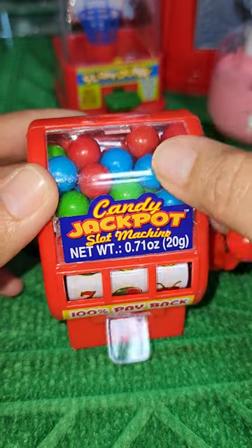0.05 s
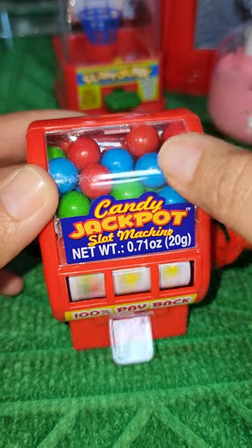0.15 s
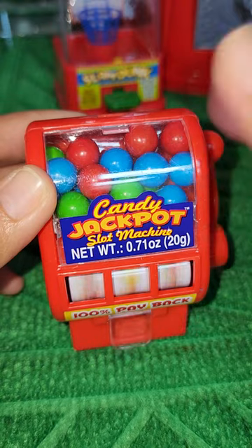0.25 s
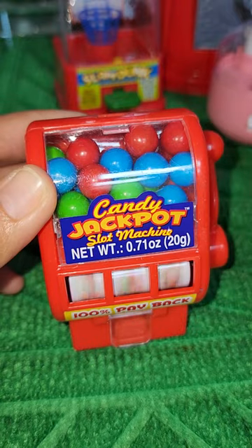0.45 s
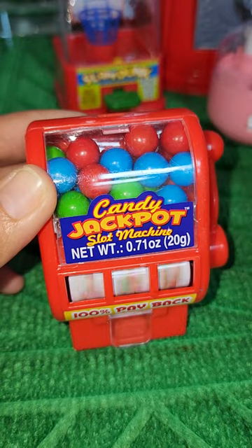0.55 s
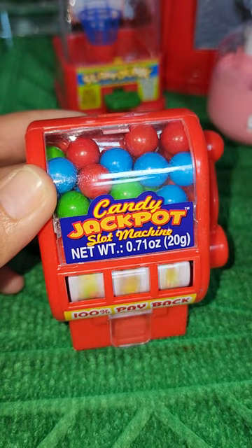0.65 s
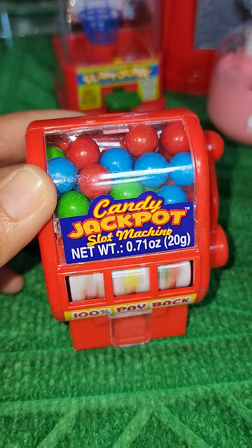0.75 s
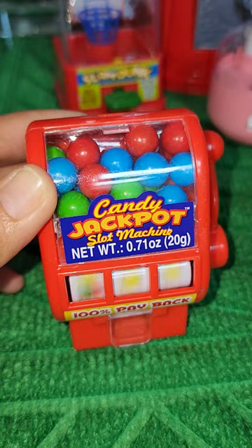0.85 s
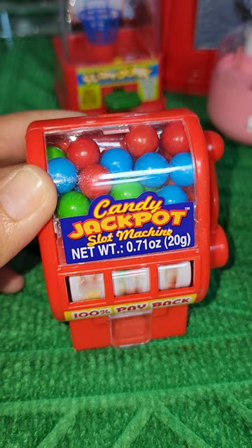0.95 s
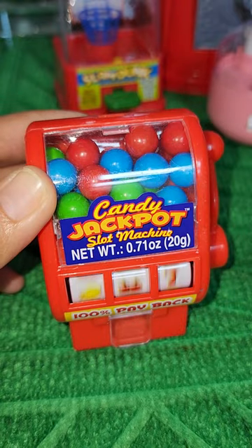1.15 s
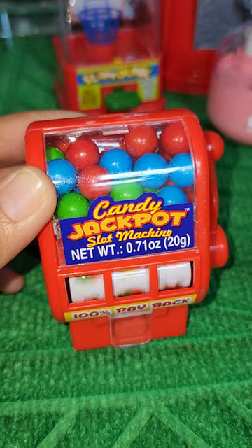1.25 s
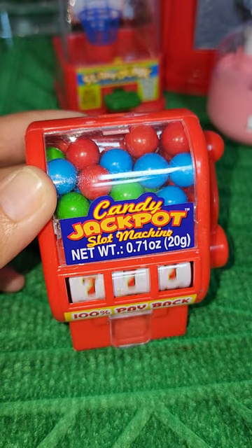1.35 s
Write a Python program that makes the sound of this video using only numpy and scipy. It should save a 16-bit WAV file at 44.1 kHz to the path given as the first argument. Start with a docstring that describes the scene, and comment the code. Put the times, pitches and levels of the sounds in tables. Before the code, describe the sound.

A small plastic toy slot machine spins close to the microphone in a quiet room. At about 0.2 seconds its lever rasps quickly back over the gears and snaps against its stop just before 0.3 seconds, the loudest moment. Loose reels then rattle and whir inside the hollow casing, gradually weakening. From about 0.9 seconds only a soft whir with a few faint ticks remains, until around 1.4 seconds.

```python
"""A small plastic toy slot machine is held close to the microphone in a quiet room.
Its lever is let go, rasps back over the gears and snaps against its stop. Three loose reels spin,
knock about on their axle and settle into a soft whir; every contact rings the hollow casing."""
import sys
import numpy as np
from scipy import signal
from scipy.fft import rfft, irfft
from scipy.io import wavfile

SR = 44100
rng = np.random.default_rng(int(sys.argv[2]) if len(sys.argv) > 2 else 0)


def wrap_up_sound(samples):
    """Save the sound to the file named by the first command line argument, as 16-bit audio."""
    columns = np.atleast_2d(samples).T
    # keep every value between -1 and 1, then stretch to whole-number steps
    tamed = np.clip(columns, -1, 1)
    steps = np.round(tamed * 32767).astype(np.int16)
    wavfile.write(sys.argv[1], SR, steps)


N = 61739

# gear teeth slip as the lever returns: (s, level dB, treble relative to it dB, chatter length s)
GEAR_SLIPS = [(0.2088, -30, -20, .004), (0.2142, -15, -22, .001), (0.2225, -18, -13, .006), (0.2345, -15, -15, .006), (0.2440, -17, -13, .005), (0.2482, -16, -14, .004), (0.2530, -12, -15, .004), (0.2590, -16, -10, .005), (0.2652, -15, -11, .005), (0.2698, -17, -14, .003)]  # fixed
# the lever hits its stop and bounces: (s, level dB, treble relative to it dB, chatter length s)
LEVER_STOP = [(0.2836, -6.5, -11, .003), (0.2868, -8.5, -8, .008)]  # fixed
# the reels knock on their axle: (s, level dB, treble relative to it dB)
REEL_KNOCKS = [(0.3104, -20, -4), (0.3246, -15, -15), (0.3356, -15, -15), (0.3465, -21, -9), (0.3541, -15, -12),
               (0.3631, -19, -15), (0.3735, -17, -15), (0.3847, -21, -7), (0.3923, -17, -14), (0.4185, -19, -12),
               (0.4294, -20, -13), (0.4391, -23, -11), (0.4543, -24, -11), (0.4717, -18, -11), (0.4968, -30, -11),
               (0.5042, -24, -11), (0.5145, -26, -11), (0.5222, -25, -14), (0.5399, -24, -12), (0.5569, -23, -16),
               (0.5664, -27, -14), (0.575, -16, -13), (0.585, -28, -20), (0.5924, -21, -14), (0.6058, -24, -13),
               (0.6168, -25, -8), (0.6282, -20, -12), (0.638, -33, -16), (0.6458, -24, -12), (0.6622, -22, -15),
               (0.6738, -26, -10), (0.6849, -21, -16), (0.7018, -23, -20), (0.7156, -24, -19), (0.7329, -23, -13),
               (0.7404, -23, -17), (0.7564, -30, -17), (0.7757, -27, -21), (0.7821, -30, -14), (0.7959, -26, -15),
               (0.8081, -26, -14), (0.8193, -26, -14), (0.8321, -25, -14), (0.843, -24, -18), (0.8496, -28, -6),
               (0.8624, -25, -10), (0.8796, -28, -15), (0.8857, -31, -14), (0.8926, -30, -14), (0.9022, -28, -17),
               (0.915, -31, -22), (0.9233, -36, -14), (0.9688, -34, -23), (1.0189, -35, -22), (1.0253, -36, -16),
               (1.051, -36, -30), (1.1317, -32, -22), (1.1412, -34, -21), (1.1685, -34, -15), (1.1783, -35, -19),
               (1.3927, -36, -22)]  # fixed
# rubbing of the turning parts: (s, level dB, treble relative to it dB)
RUB = [(0, -42.5, -24.5), (0.04, -54.5, -16.5), (0.14, -69.5, -18.5), (0.2, -53.5, -19.5), (0.212, -27.5, -16.5), (0.25, -21.5, -13), (0.3, -25, -12.5), (0.41, -26, -13.5), (0.48, -24.5, -18), (0.53, -38, -17.5), (0.6, -34.5, -12.5), (0.74, -31, -18.5), (0.77, -37.5, -18), (0.87, -32, -21.5), (0.94, -39.5, -24), (1.17, -39.5, -24.5), (1.22, -40.5, -23), (1.4, -45, -25)]
# hollow casing: (Hz, width Hz, level dB, left-right dB, right ear's phase lead rad)
CASING = [(718, 155, -12.5, 3.7, 0.6), (841, 101, -2.5, -4.7, 0.3), (922, 69, -6.1, -12.9, 0.5),
          (1119, 170, -11.3, -5.1, -2.5), (1439, 145, 0.0, -5.7, -2.4), (1564, 106, -10.9, 3.6, -2.3),
          (1713, 146, -9.2, -1.8, -1.0), (1932, 238, -7.5, -17.5, -1.8), (2475, 307, -6.4, -8.2, -5.6),
          (2877, 132, -13.9, -1.6, 0.9), (3600, 225, -8.4, 9.1, -1.1), (3892, 212, -18.1, -22.8, -4.1)]  # fixed
# thin reel shells: same columns
SHELLS = [(5600, 400, -11, 5, 0), (6800, 1500, -7, 8, 0), (8600, 110, -4, 11, 0), (9000, 450, -8, 4, 0), (11650, 220, -11, 4, 0), (12750, 400, -3, 8, 0), (14000, 380, -7, 8, 0), (15250, 900, -1, 5, 0)]  # fixed
# lever and gear train: same columns
LEVER = [(747, 188, -10.9, -4.6, 0.9), (852, 162, -16.9, -3.1, 2.3), (903, 139, -6.1, -9.6, 1.1),
         (1087, 72, -8.8, -9.4, -1.7), (1298, 122, -10.1, -2.4, -1.0), (1456, 173, 0.0, -6.9, -2.5),
         (1760, 159, -11.1, -4.9, -2.1), (1939, 305, -3.8, -12.7, -1.3), (2457, 322, -9.0, -11.5, 0.3),
         (3125, 509, -1.7, 1.4, 0.2), (3256, 103, -28.5, -1.5, -1.4), (3549, 199, -10.3, 7.4, 1.9),
         (3859, 108, -18.8, -5.6, 0.4)]  # fixed
# sharp edge of the lever's contacts: same columns
LEVER_EDGE = [(4008, 382, -43, 7, 0.0), (5730, 250, -14, -13, -0.11), (6460, 140, -15, 23, -0.1),
              (7380, 700, -13.5, 9.5, 0.32), (9200, 1300, -18, 6, 1.3), (12100, 6900, -20, 12, 0.46),
              (15500, 1000, -16, -1, -0.34)]
# dull rumble of the held toy and the room: (Hz, dB per Hz)
RUMBLE = [(20, -34), (32, -4), (48, -1), (68, -1.5), (88, -9.5), (125, 1), (155, 1.5), (220, 0.5), (260, -11), (310, -5.5), (400, -13.5), (600, -30), (1500, -31), (5000, -40), (16000, -62)]
RUMBLE_SIDE_DB = -16.5
# level of the rumble: (s, dB)
RUMBLE_LEVEL = [(0, -44), (0.18, -52), (0.27, -40.5), (0.5, -43.5), (0.93, -42.5), (1.05, -46.5), (1.4, -46)]
# wavering low hum: (Hz, level dB)
HUM = [(186, -56.5), (221, -53), (296, -59.5), (705, -64.5)]
HUM_WIDTH_HZ = 11  # fixed
GRAINS_PER_S, GRAIN_SPREAD_DB = 4000, 2.2  # fixed
BODY_LOW_HZ, BODY_HIGH_HZ, TREBLE_LOW_HZ = 620, 4300, 4000  # fixed
TREBLE_LAG_S = 0.000239   # the treble reaches the right ear later
SCATTER_DB, SCATTER_T60_S = -10, .018   # fixed
ROOM_DB, ROOM_T60_S = -16, .25  # fixed
LEVEL_WINDOW_S = .004   # a knock's level is its energy spread over this time
CUTOFF_HZ = 15900   # fixed
TIME = np.arange(N) / SR
KNOCK_CHATTER_S = .0045
CHATTER_LEAD = .25   # share of the chatter that comes before the main contact
MODE_SPREAD_DB, MODE_SPREAD_RAD = 2, .45   # fixed
CONTACT_HZ, CONTACT_DB, DB_PER_OCTAVE = 9200, -70, 17   # treble edge of a tick of that level; harder ticks are brighter
RUB_TOP_HZ = 11300
TURNS_PER_S, WOBBLE_DB, SWELL_AT_S = 18, 2.5, 1   # an uneven reel rubs harder once a turn
SPRING_HZ, SPRING_WIDTH_HZ, SPRING_DB = 3253, 27, 6.5   # the return spring sings with each slip's sharp edge
SOFT_HZ, SOFT_DB, HARD_DB = 2200, -23, -7   # fixed
FLUTTER_PER_S, FLUTTER_DB = 260, 1.6   # fixed
BRUSH_DB = 3   # the rims brush the casing twice a turn
CHATTER_DB = -4  # fixed


def amp(db):
    """Decibels to gain."""
    return 10 ** (np.asarray(db) / 20)


def rms_one(x):
    """Scale to unit rms."""
    return x / np.sqrt(np.mean(x ** 2) + 1e-20)


def energy_one(x):
    """Scale a stereo sound to unit energy per channel."""
    return x / np.sqrt(np.sum(x ** 2) / 2 + 1e-20)


def cut(x, hz, kind, order=2):
    """Butterworth high- or low-pass."""
    return signal.sosfilt(signal.butter(order, min(hz, .45 * SR), kind, fs=SR, output="sos"), x)  # fixed


def convolve(x, response):
    """Play a sound through a stereo response."""
    return signal.fftconvolve(np.atleast_2d(x), response, axes=1)[:, :N]


def reflections(db, t60, size=12000):
    """The direct sound, then a dying wash of reflections that differs on each side."""
    t = np.arange(size) / SR
    wash = energy_one(rng.standard_normal((2, size)) * amp(-60 * t / t60) * (1 - np.exp(-t / .002)))  # fixed
    return energy_one((t == 0) + amp(db) * wash)


def ring(modes, lag_s, size=1800):
    """Stereo ring of a part after one contact: damped sines, struck a little differently each time."""
    t = np.maximum(np.arange(size) / SR - np.array([[0], [lag_s]]), -1 / SR)
    out = 0
    for hz, width, db, pan, phase in modes:
        gain = amp(db + pan * np.array([[.5], [-.5]]) + MODE_SPREAD_DB * rng.standard_normal((2, 1))) * np.sqrt(width)
        angle = np.array([[0], [phase]]) + MODE_SPREAD_RAD * rng.standard_normal((2, 1))
        out = out + gain * (t >= 0) * np.exp(-np.pi * width * t) * np.cos(2 * np.pi * hz * t + angle)
    return out


def voice(body_modes, treble_modes):
    """A part's hollow body ring and its bright tick."""
    body = cut(cut(ring(body_modes, 0), BODY_LOW_HZ, "high", order=3), BODY_HIGH_HZ, "low", order=3)
    return energy_one(body), energy_one(cut(ring(treble_modes, TREBLE_LAG_S), TREBLE_LOW_HZ, "high", order=3))


def knocks(rows, part, chatter_db, body_db, treble_db):
    """Play a table of knocks on one part."""
    out = np.zeros((2, N + SR))
    for s, db, bright_db, chatter_s in rows:
        start, sound = knock(part, s, db + body_db, bright_db + treble_db, chatter_s, chatter_db)
        out[:, start:start + sound.shape[1]] += sound
    return out[:, :N]


def lever():
    """The spring pulls the lever over the gear teeth and against its stop."""
    part = LEVER, LEVER_EDGE
    rasp = knocks(GEAR_SLIPS, part, chatter_db=CHATTER_DB, body_db=-0.06, treble_db=-0.7)
    return rasp + spring() + knocks(LEVER_STOP, part, chatter_db=CHATTER_DB, body_db=-0.8, treble_db=0.8)


def whir(part, count=6):
    """Rubbing is a dense stream of tiny contacts on both faces of each reel; it swells once a turn."""
    level_db, bright_db = (np.interp(TIME, np.array(RUB)[:, 0], column) for column in np.array(RUB).T[1:])
    hard = hardness(bright_db)
    angle = 2 * np.pi * TURNS_PER_S * (TIME - SWELL_AT_S)
    flutter = np.interp(TIME * FLUTTER_PER_S, np.arange(N), rng.standard_normal(N))
    level_db = level_db + WOBBLE_DB * np.cos(angle) + FLUTTER_DB * flutter
    bright_db = bright_db + BRUSH_DB * np.cos(2 * angle)
    out = 0
    for face in range(count):
        body, tick = voice(*part)
        sizes = amp(GRAIN_SPREAD_DB * np.minimum(rng.exponential(1, N), 4)) * rng.choice([-1, 1], N)
        grains = rms_one(sizes * (rng.random(N) < GRAINS_PER_S / count / SR)) * amp(level_db) / np.sqrt(count)
        is_hard = rng.random(N) < hard
        out = out + convolve(grains * is_hard, body) + convolve(grains * ~is_hard, cut(body, SOFT_HZ, "low", order=3))
        out = out + convolve(grains * amp(bright_db), energy_one(cut(tick, RUB_TOP_HZ, "low")))
    return out


def reels():
    """The loose reels knock and rub inside the casing."""
    part = CASING, SHELLS
    rows = [(*row, KNOCK_CHATTER_S) for row in REEL_KNOCKS]
    return knocks(rows, part, chatter_db=CHATTER_DB, body_db=-0.5, treble_db=0.2) + whir(part)


def background():
    """Low rumble, a little stronger once the reels spin, and a wavering hum."""
    hz = np.maximum(np.arange(N // 2 + 1) * SR / N, 1)
    points = np.array(RUMBLE)
    colour = amp(np.interp(np.log(hz), np.log(points[:, 0]), points[:, 1]))
    mid, side = rms_one(irfft(rfft(rng.standard_normal((2, N))) * colour, N))
    level_db = np.interp(TIME, *np.transpose(RUMBLE_LEVEL))
    hum = sum(amp(db) * rms_one(irfft(rfft(rng.standard_normal(N)) / (1 + (2 * (hz - f) / HUM_WIDTH_HZ) ** 2), N)) for f, db in HUM)
    return amp(level_db) * (mid + amp(RUMBLE_SIDE_DB) * side * [[1], [-1]]) + hum


def knock(part, s, db, bright_db, chatter_s, chatter_db, count=24):
    """One main contact inside a quick chatter of smaller ones; returns its start sample and sound."""
    place = (np.arange(count) + rng.random(count)) / count
    body, tick = voice(*part)
    body = cut(body, SOFT_HZ * 3 ** hardness(bright_db), "low", order=3)
    tick = cut(tick, CONTACT_HZ * 2 ** ((db + bright_db - CONTACT_DB) / DB_PER_OCTAVE), "low")
    sound = 0
    for response, level_db in ((body, db), (tick, db + bright_db)):
        clicks = np.zeros(SR // 50)  # fixed
        clicks[int(CHATTER_LEAD * chatter_s * SR)] = 1
        sizes = amp(chatter_db) * rng.standard_normal(count) * np.sin(np.pi * np.sqrt(place))
        np.add.at(clicks, np.minimum((place * chatter_s * SR).astype(int), len(clicks) - 1), sizes)
        sound = sound + energy_one(convolve(clicks, response)) * np.sqrt(LEVEL_WINDOW_S * SR) * amp(level_db)
    return int((s - CHATTER_LEAD * chatter_s) * SR), sound


def hardness(bright_db):
    """0 for a dull contact, which rings only the modes below SOFT_HZ; 1 for a bright, hard one."""
    return np.clip((bright_db - SOFT_DB) / (HARD_DB - SOFT_DB), 0, 1)


def spring():
    """Every slipping tooth sets the spring ringing."""
    clicks = np.zeros(N)
    for s, db, bright_db, _ in GEAR_SLIPS:
        clicks[int((s + rng.uniform(0, 1 / SPRING_HZ)) * SR)] = amp(db + bright_db + SPRING_DB)
    return convolve(clicks, np.exp(-np.pi * SPRING_WIDTH_HZ * TIME) * np.sin(2 * np.pi * SPRING_HZ * TIME + np.array([[0], [1]])))


def scene():
    """The toy, its near reflections and the room."""
    toy = convolve(lever() + reels(), reflections(SCATTER_DB, SCATTER_T60_S))
    return convolve(toy, reflections(ROOM_DB, ROOM_T60_S)) + background()


def record(dry):
    """The highest peak is rounded and the top is cut."""
    return signal.sosfilt(signal.ellip(12, .1, 70, CUTOFF_HZ, fs=SR, output="sos"), 1.3 * np.tanh(dry / 1.3))  # fixed


dry = scene()
out = record(dry)
wrap_up_sound(out)
```